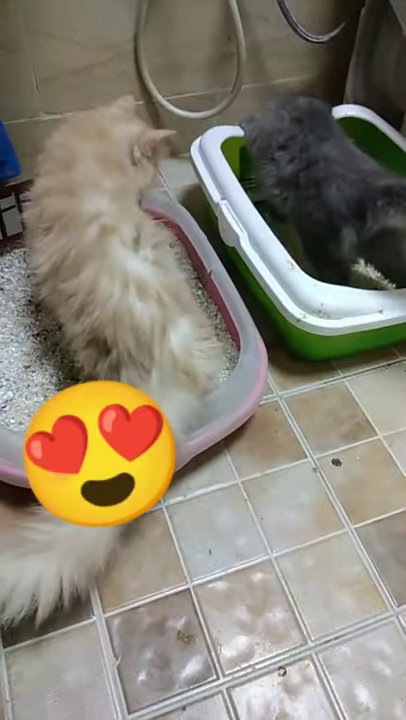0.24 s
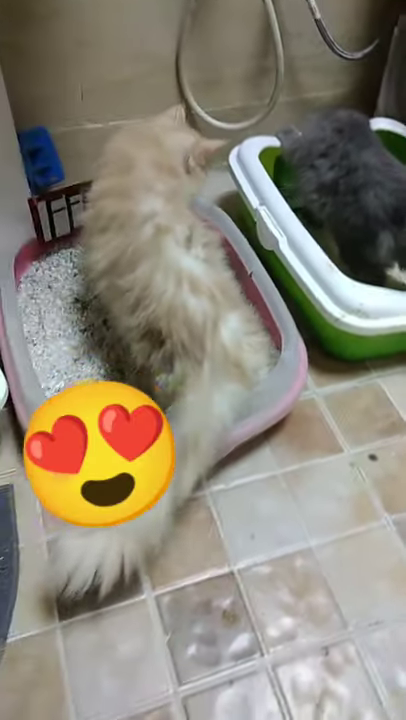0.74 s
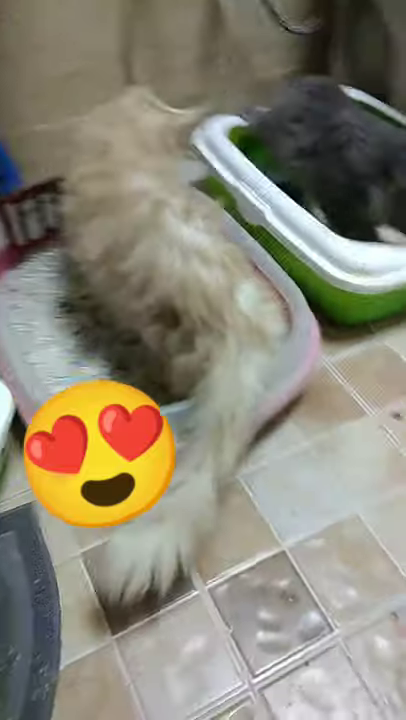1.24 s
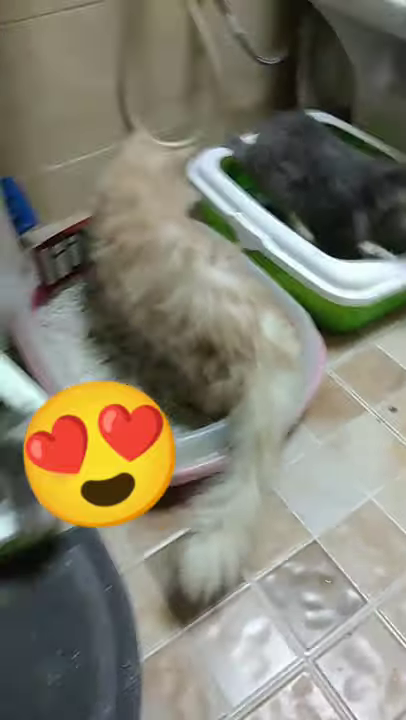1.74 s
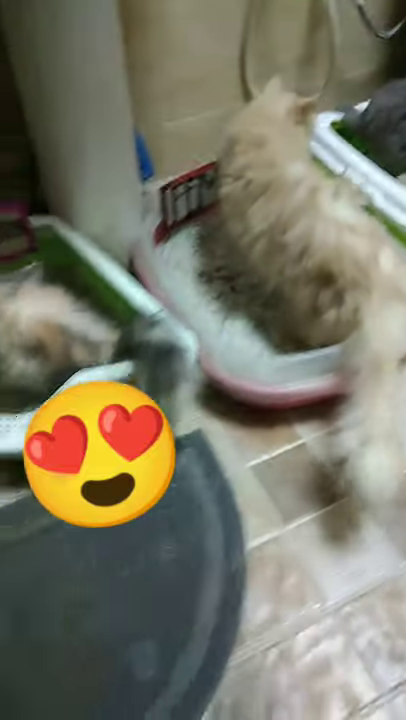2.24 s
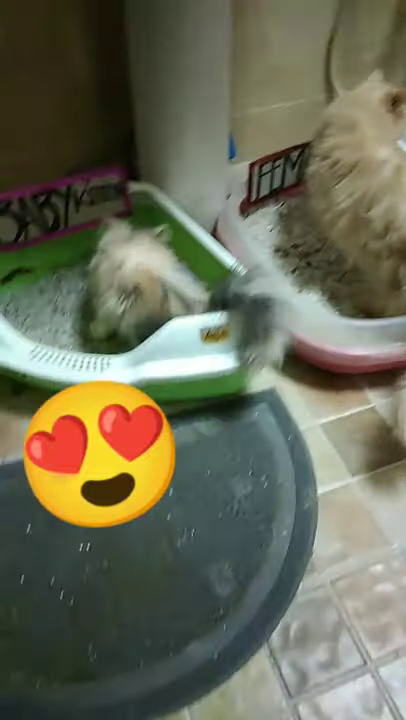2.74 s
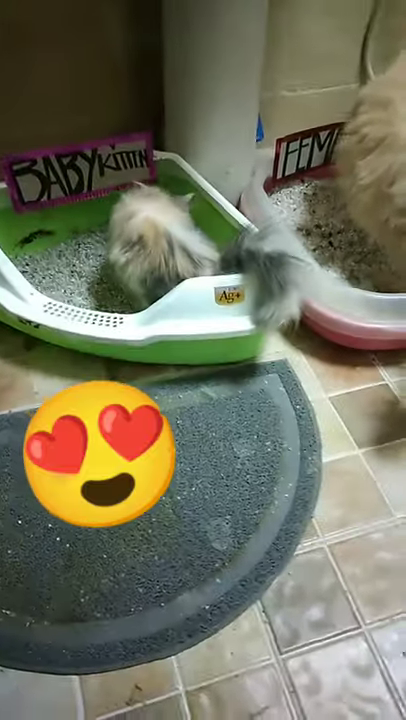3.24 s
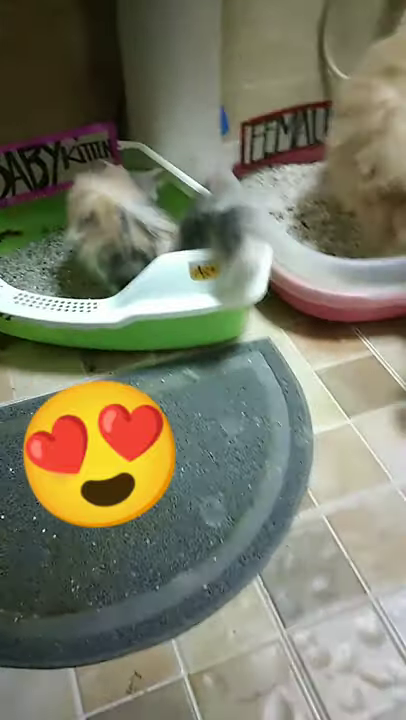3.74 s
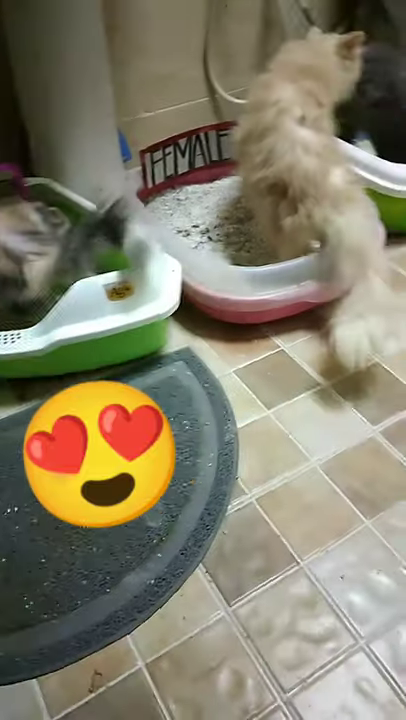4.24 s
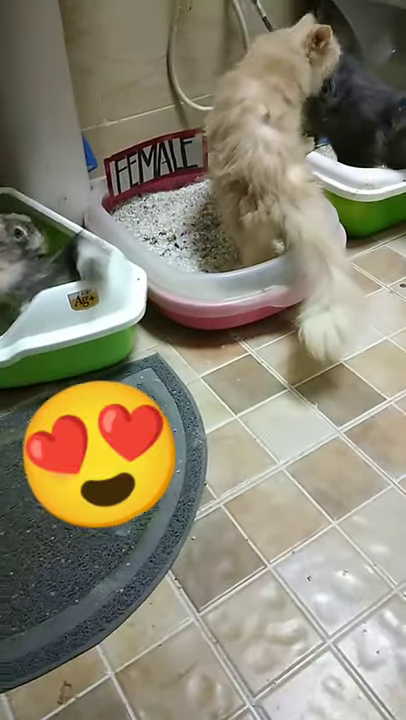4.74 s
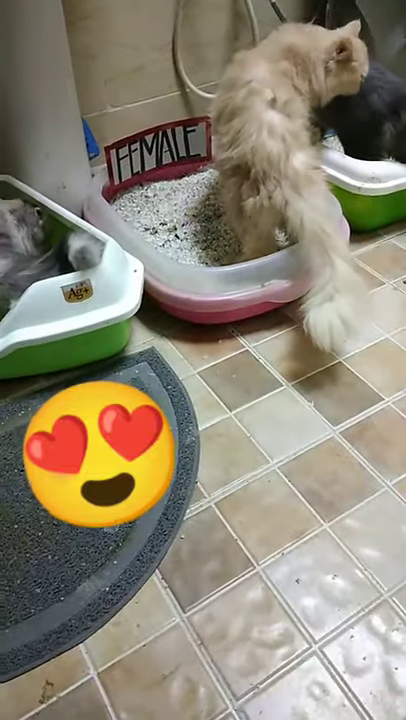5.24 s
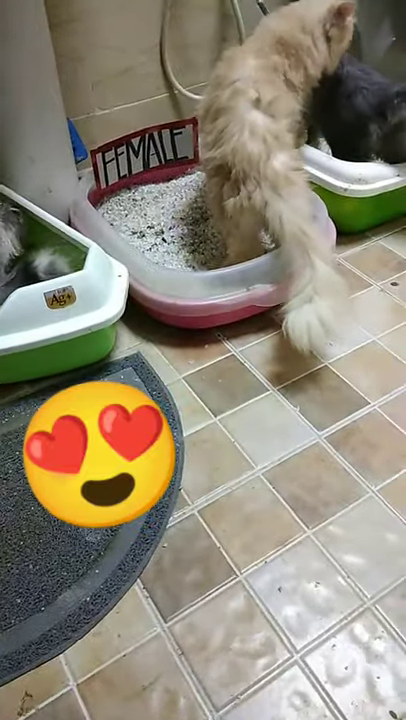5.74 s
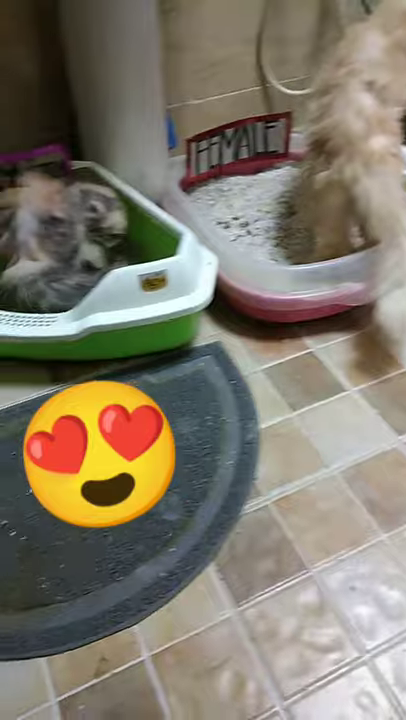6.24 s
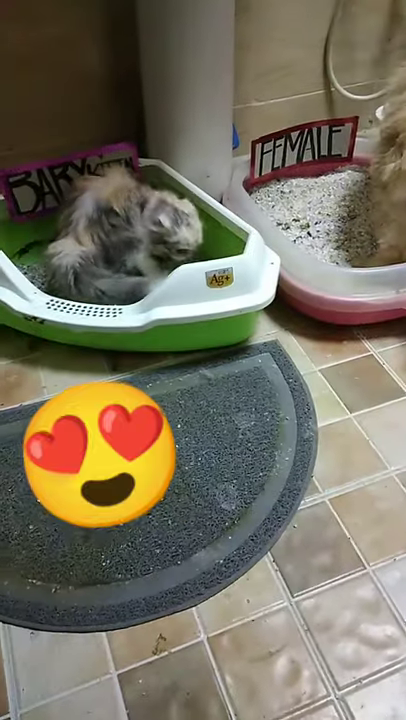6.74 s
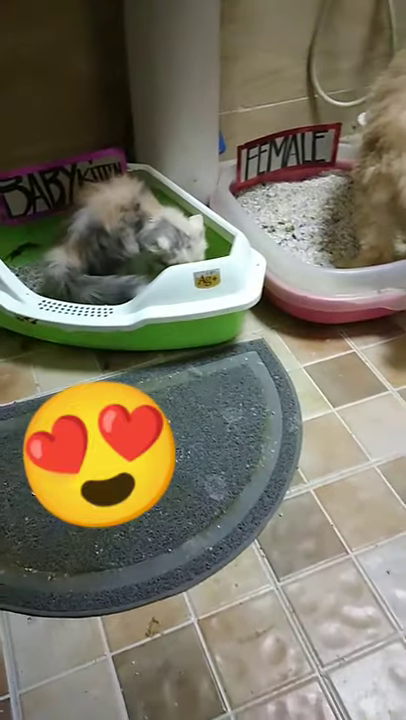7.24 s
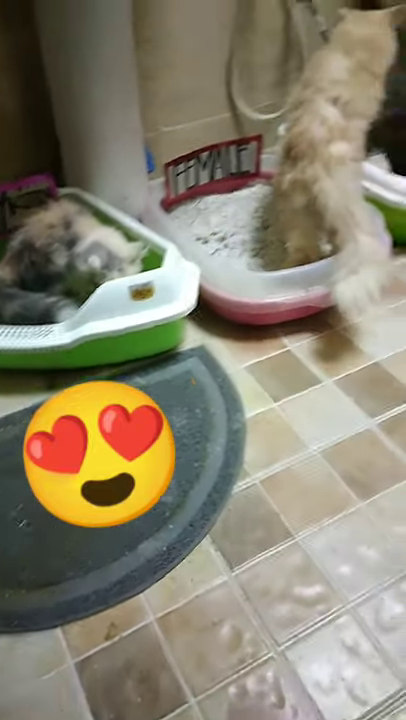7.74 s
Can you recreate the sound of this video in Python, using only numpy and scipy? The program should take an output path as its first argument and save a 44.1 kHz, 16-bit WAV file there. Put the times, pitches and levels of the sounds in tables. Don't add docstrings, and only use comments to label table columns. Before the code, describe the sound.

In a small tiled room, a steady low electrical hum and fan rush continue throughout. After a nearly quiet start, cats' paws make short gritty swipes in plastic litter trays, with a loud pellet crack early on. More rustles follow, then a sparse faint stretch, before a bright, loud scratch and hard clicks at the end. A handheld phone catches it in stereo, treble thinned by noise suppression.

```python
import sys
import numpy as np
from scipy import signal
from scipy.fft import rfft, irfft
from scipy.io import wavfile
from scipy.ndimage import uniform_filter1d

SR = 44100
rng = np.random.default_rng(int(sys.argv[2]) if len(sys.argv) > 2 else 0)


def transcribe(signal):
    frames = np.atleast_2d(signal).T
    limited = np.clip(frames, -1, 1)
    pcm = np.round(limited * 32767).astype(np.int16)
    wavfile.write(sys.argv[1], SR, pcm)


def volts_from_db(level):
    exponent = np.asarray(level, float) / 20
    return 10 ** exponent


N = 352359


def level(x, db):
    return x * volts_from_db(db) / np.sqrt(np.mean(x ** 2))


def resonate(x, hz, width_hz):
    return signal.lfilter(*signal.iirpeak(hz, hz / width_hz, SR), x)


def band(x, lo_hz, hi_hz):
    return signal.sosfilt(signal.butter(3, [lo_hz, hi_hz], "band", fs=SR, output="sos"), x)


def on_log(hz, curve):
    points_hz, values = np.transpose(curve)
    return np.interp(np.log(hz), np.log(points_hz), values)


def wander(rate_hz):
    hold = int(SR / rate_hz)
    steps = np.repeat(rng.standard_normal(640), hold)[:N]
    return 1.01 * uniform_filter1d(uniform_filter1d(steps, hold), hold)


def sides(db):
    return volts_from_db(np.array([db, -db]) / 2)


# frequency in Hz, density in dB per Hz.
AIR_SPECTRUM = [(15, -83), (25, -32.5), (112, -10), (236, -7.5), (294, -7), (318, -7.5), (352, -11),
                (547, -14), (695, -14), (1190, -24), (1430, -24), (2130, -42), (2410, -36), (3000, -39.5),
                (3900, -102.5), (6600, -120)]
# frequency in Hz, left minus right in dB.
AIR_LEFT = [(60, 0.5), (200, 2.5), (700, -1), (1300, 10), (2400, 16.5), (4400, 29.5)]


def air():
    hz = np.fft.rfftfreq(N, 1 / SR)[1:]
    mid, side = rfft(rng.standard_normal((2, N)))[:, 1:]
    alike = 1 / (1 + (hz / 450) ** 2.46 + (30 / hz) ** 2)
    pair = np.sqrt(1 + alike) * mid + np.sqrt(1 - alike) * side * np.array([[1], [-1]])
    pair = pair * volts_from_db(on_log(hz, AIR_SPECTRUM)) * sides(on_log(hz, AIR_LEFT))
    rush = 0
    for octave in np.arange(-5.5, 2.5, 0.5):
        share = np.cos(np.pi * np.clip(np.log2(hz / 1000) - octave, -0.5, 0.5)) ** 2
        half_octave = irfft(np.pad(pair * share, ((0, 0), (1, 0))), N)
        rush = rush + volts_from_db(0.93 * wander(5.6)) * half_octave
    rush = level(rush, -47)
    shield = 0.5 * (1 - np.interp(np.arange(N) / SR, [0.9, 1.3], [0, 1]))
    high_pass = signal.butter(2, 1500, "high", fs=SR, output="sos")
    return rush - shield * signal.sosfiltfilt(high_pass, rush)


# frequency in Hz, left level in dB and right level in dB at the
# first place of the phone, left level in dB and right level in dB at the second, left phase lead in radians.
TONES = [(100.1, -69, -71, -63, -65, .2), (200.2, -54, -52, -57, -55, .6), (300.26, -43, -44, -49, -47, .1),
         (400.4, -56, -54, -64, -67, .4), (500.4, -61, -66, -63, -68, .3), (600.5, -68, -77, -65, -65, 0),
         (700.6, -66, -66, -69, -60, -.7), (800.7, -68, -71, -61, -73, 1.2),
         (1001, -72, -74, -72, -74, 1.1), (102.4, -72, -74, -65, -67, .2), (181.9, -68, -72, -58, -59, .15),
         (236.7, -72, -72, -63, -58, .1), (281.5, -52, -49, -54, -55, -.3)]
# time in seconds, share of the second place from 0 to 1.
PLACE = [
    (0, 0),
    (2.1, 0.051),
    (3.2, 1),
    (4.2, 0.92),
    (8, 1),
]


def hum():
    t = np.arange(N) / SR
    place = np.interp(t, *np.transpose(PLACE))
    drone = 0
    for hz, left_1, right_1, left_2, right_2, lead in TONES:
        left_db = left_1 + (left_2 - left_1) * place
        right_db = right_1 + (right_2 - right_1) * place
        gain = np.sqrt(2) * volts_from_db(np.array([left_db, right_db]) + 0.36 + wander(2.47))
        phase = 2 * np.pi * (hz * t + rng.random()) + np.array([[lead], [0]])
        drone = drone + gain * np.sin(phase)
    return drone


def still_room():
    return level(band(rng.standard_normal((2, N)), 2600, 10000), -66.5)


# start in seconds, level in dB, frequency in Hz,
# bandwidth in Hz, length in seconds.
BUMPS = [(0.785, -66.5, 2790, 150, 0.13), (1.17, -57.5, 3030, 590, 0.43), (7.835, -39, 2750, 500, 0.08),
         (3.738, -40, 230, 60, 0.02), (3.74, -47.5, 608, 50, 0.077), (4.135, -46, 560, 200, 0.028),
         (4.674, -58, 2490, 70, 0.084), (4.882, -57, 1750, 70, 0.043), (5.115, -58.5, 2040, 69.5, 0.042),
         (6.605, -51.5, 1260, 120, 0.045), (6.624, -53, 1150, 100, 0.074)]


def bumps():
    t = np.arange(N) / SR
    noise = rng.standard_normal((2, N))
    rubs = 0
    for start_s, db, hz, width_hz, length_s in BUMPS:
        rub = noise[0] + noise * min(hz / 1500, 1)
        rub = level(resonate(rub, hz, width_hz), db)
        swell = np.sin(np.pi * np.clip((t - start_s) / length_s, 0, 1) ** 1.06)
        rubs = rubs + rub * sides(4)[:, None] * swell
    return rubs


# frequency in Hz, bandwidth in Hz, level in dB.
TRAY = [
    (1430, 1070, -5),
    (1950, 690, 3.5),
    (2653, 270, 4.5),
    (3187, 710, -4.5),
    (4700, 1250, -8.5),
]


def tray(x, modes):
    ring = 0
    for k, (hz, width_hz, db) in enumerate(modes):
        wide_hz = 1.86 * width_hz
        mode = resonate(resonate(x, hz, wide_hz), hz, wide_hz)
        ring = ring + (-1) ** k * volts_from_db(db) * mode
    return ring


def tile_reflections(x, t60_s, start_s):
    s = np.arange(SR // 2) / SR
    decay = np.exp(-np.log(1000) * s / t60_s) * (s >= start_s)
    tail = rng.standard_normal((2, SR // 2)) * decay
    tail = tail / np.sqrt(np.sum(tail ** 2, axis=1, keepdims=True))
    return signal.fftconvolve(x * np.ones((2, 1)), tail, axes=1)[:, :N]


# time in seconds, peak level in dB, left minus right in dB,
# tray-wall ring in dB relative to the crack.
TICKS = [(0.001, -40.5, -1, 10.5), (0.924, -41.5, 17, -32), (0.997, -38, 2, -17), (1.072, -38, -12, -18),
         (1.214, -49, 5, -17), (1.51, -45, 17.5, -23), (1.824, -30, -3, -1), (2.036, -24, 8, 3),
         (2.256, -37, 14, -8), (2.2852, -8.5, 17.5, 2), (2.7428, -35, 16, -30.5), (2.762, -35, 6, -25),
         (2.801, -24.5, 14.5, -34), (2.8264, -19, 7, -25), (2.8384, -24, 9, -31), (3.445, -34, 10, 4),
         (3.643, -26, 17, -22), (3.927, -35.5, 7, -19), (4.099, -39.5, 31, -25), (4.1417, -32.5, 3, 6.5),
         (4.1585, -34, 9, 0.5), (4.3944, -34, -13, -24), (4.931, -39.5, 0, -11.5),
         (7.501, -30.5, 11, -34.5), (7.7997, -14, 7, -0.5), (7.8334, -9.5, -1, 5.5),
         (7.8379, -9.5, 16, -32), (3.698, -26, 13, -20), (7.952, -25, 4, -22)]


def ticks():
    length = 400
    crack, ring = np.zeros((2, 2, N + length))
    fade = np.exp(-np.arange(length) / SR / 0.00085)
    for start_s, db, left_db, wall_db in TICKS:
        noise = rng.standard_normal((2, length))
        at = slice(int(start_s * SR), int(start_s * SR) + length)
        crack[:, at] += volts_from_db(db + 2) * sides(left_db)[:, None] * fade * noise
        ring[:, at] += volts_from_db(db + wall_db + 7.5) * fade * (0.32 * noise[0] + noise)
    bright = band(crack, 4300, 12400) + volts_from_db(-8.5) * band(crack, 12400, 15500)
    hits = (bright + tray(ring, TRAY))[:, :N]
    return hits + volts_from_db(-6.5) * tile_reflections(hits.mean(axis=0), 0.55, 0.0038)


def stroke(t, rise_s, hold_s, settle_db_per_s, tiles_db):
    after = np.maximum(t - rise_s - hold_s, 0)
    rise = np.clip(t / rise_s, 0, 1) ** 2.02
    near = rise * volts_from_db(-2 * settle_db_per_s * after)
    tiles = rise * volts_from_db(2 * (tiles_db - 58.5 * after))
    return np.array([near * (after == 0), near * (after > 0), tiles])


# start in seconds, rise in seconds, grain level in dB,
# low tray-wall ring in dB and high tray-wall ring in dB relative to the grains.
SWIPES = [(0.76, 0.0084, -62, -17, -25), (1.807, 0.037, -34, -13, -14.5), (2.02, 0.024, -38.5, -2.5, -3),
          (2.279, 0.019, -35, -5, -9.5), (2.505, .021, -42.5, -16, -10), (2.777, 0.053, -33.5, -9, -14.5),
          (3.3, 0.051, -49, -3.5, -8), (3.428, 0.028, -31, -14.5, -16), (3.599, 0.066, -33, -14.5, -17),
          (3.68, 0.031, -46, -4, -4), (4.135, 0.054, -53.5, -11, -3), (4.39, 0.0064, -47.5, -17, -25),
          (4.622, 0.012, -50, -6, -16), (4.918, 0.017, -51, -3, -26), (5.475, 0.0069, -53, -7, -19),
          (6.09, 0.013, -52, -9, -16), (7.548, 0.011, -38, -7, -15), (7.776, 0.034, -28, -7.5, -3.5),
          (7.817, 0.014, -22, -11.5, -11)]
# start in seconds, length in seconds, grain level in dB,
# low tray-wall ring in dB and high tray-wall ring in dB relative to the grains.
DRAGS = [(0.92, .25, -58, -28, -18), (1.18, 0.2, -51.5, -7, -8), (1.42, 0.12, -64, 1.5, -17),
         (3.54, 0.063, -49, -8, -6), (3.929, 0.18, -63.5, -3, -5), (4.1, .03, -60, -16, -18),
         (5.09, 0.052, -56.5, -0.5, -13), (5.33, 0.041, -70, -6, -22), (5.6, 0.17, -78, -9, -6),
         (5.76, 0.053, -57, -16, -10.5), (6.1, 0.096, -60, -18, -14), (6.4, 0.038, -60, -19, -8),
         (6.63, 0.25, -64, 4, -1), (6.83, .3, -55.5, 0.5, -4.5), (7.158, 0.099, -51.5, -0.5, -6.5),
         (7.569, 0.026, -39.5, -10, -13)]
# time in seconds, grain level in dB.
SHIFT = [(0, -80), (.8, -69), (1., -62), (1.5, -60), (1.78, -68), (2.7, -61), (3.05, -67), (3.28, -63.5),
         (3.9, -61), (4.3, -60), (4.6, -58), (5.3, -61), (5.45, -62), (5.7, -59.5), (6.05, -61.5),
         (6.6, -61), (7.45, -56.5), (8, -56.5)]


def paws():
    hop = 16
    t = np.arange(0, N, hop) / SR
    part_left = sides(np.array([3, 0, 3.5])) ** 2
    shift = volts_from_db(2 * (np.interp(t, *np.transpose(SHIFT)) + wander(6)[::hop]))
    layers = volts_from_db(2 * np.array([0, -30.5, -5, -14]))[:, None, None]
    power = layers * sides(3)[:, None] ** 2 * shift
    strokes = [(s, rise_s, 0, *levels) for s, rise_s, *levels in SWIPES]
    strokes += [(s, 0.015, hold_s, *levels) for s, hold_s, *levels in DRAGS]
    for start_s, rise_s, hold_s, db, low_db, high_db in strokes:
        motion = (t - start_s, max(rise_s, 1e-3), hold_s)
        clack = part_left @ stroke(*motion, 236.5, -12.5)
        sizzle = part_left @ stroke(*motion, 184, -13)
        wall = part_left @ stroke(*motion, 151, -7.5)
        power = power + volts_from_db(2 * db) * np.array([clack, sizzle, volts_from_db(2 * low_db) * wall, volts_from_db(2 * high_db) * wall])
    return np.repeat(np.sqrt(power), hop, axis=2)[:, :, :N]


def rake():
    clack_gain, sizzle_gain, low_gain, high_gain = paws()
    sizes_db = np.minimum(2.4 * rng.exponential(size=N), 15) + 1.28 * wander(40)
    grains = volts_from_db(sizes_db) * rng.standard_normal((2, N))
    clack = level(band(grains, 3960, 8710), -1.8)
    sizzle = level(band(grains, 10000, 13740), -8.5) + level(band(grains, 12980, 14500), -13.5)
    sizzle = sizzle * sides(6.5)[:, None]
    low_wall = level(tray(grains, TRAY[:2]), 7.06)
    high_wall = level(tray(grains, TRAY[2:]), 10.3)
    return clack * clack_gain + sizzle * sizzle_gain + low_wall * low_gain + high_wall * high_gain


# frequency in Hz, bandwidth in Hz, boost in dB.
PORTS = [
    (8010, 1315, 14),
    (6680, 760, 15.5),
]


def scene():
    litter = rake() + ticks() + still_room()
    litter = litter - 0.38 * resonate(litter, 3665, 380)
    ported = [x + volts_from_db(db) * resonate(x, hz, width_hz) for x, (hz, width_hz, db) in zip(litter, PORTS)]
    return volts_from_db(-9) * np.array(ported) + bumps() + hum() + air()


def low_pass(x):
    return signal.sosfilt(signal.butter(12, 15550, fs=SR, output="sos"), x)


def record(dry):
    hiss = signal.lfilter([1], [1, -0.5], rng.standard_normal((2, N)))
    hiss = level(hiss, -76.5) * sides(-2.2)[:, None]
    hz, _, (z, hiss) = signal.stft(np.array([dry, hiss]), SR, nperseg=512)
    hz = hz[:, None]
    above_hum = 1 / (1 + (1900 / (hz + 1)) ** 6)
    power = uniform_filter1d(np.abs(z) ** 2, size=3, axis=1)
    held = signal.lfilter([0.3], [1, -0.7], power)
    chance = rng.standard_normal(z.shape) + rng.standard_normal(z.shape[1:])
    patches = uniform_filter1d(uniform_filter1d(chance, size=3, axis=1), size=15, axis=2)
    error = patches * np.sqrt(45 / 2)
    masked = volts_from_db(2 * -27) * uniform_filter1d(held * above_hum, size=61, axis=1)
    wary = 1 + 2.8 / (1 + ((hz - 3900) / 900) ** 2)
    noise = (volts_from_db(2 * -78.5) + masked) * wary * volts_from_db(2 * 6 * error) * above_hum
    heard = np.maximum(power / 3, held) + 1e-18
    gain = np.clip(1 - (noise / heard) ** 2, volts_from_db(-36), 1)
    gain = gain * volts_from_db(-2 * error * above_hum)
    x = signal.istft(z * gain + hiss * (error < 1), SR, nperseg=512)[1][:, :N]
    x = 0.8 * np.tanh(x / 0.8)
    x = signal.sosfilt(signal.ellip(6, 0.3, 30, 14200, fs=SR, output="sos"), x)
    return low_pass(x)


dry = scene()
out = record(dry)
transcribe(out)
```